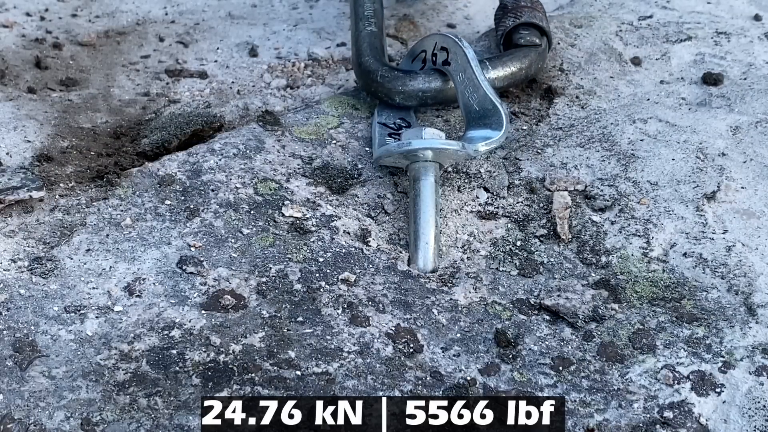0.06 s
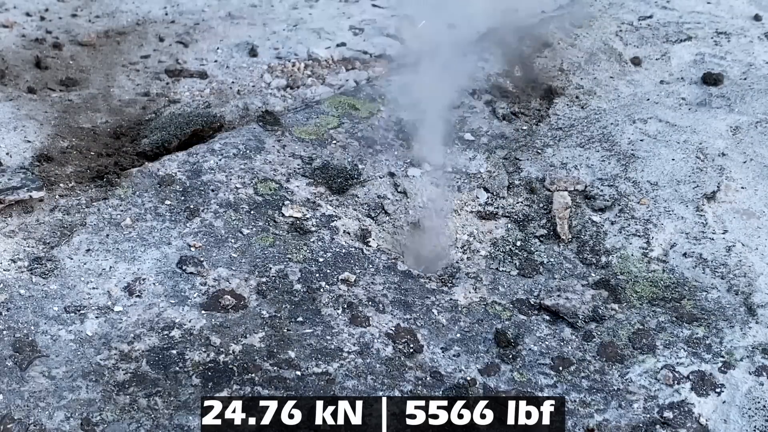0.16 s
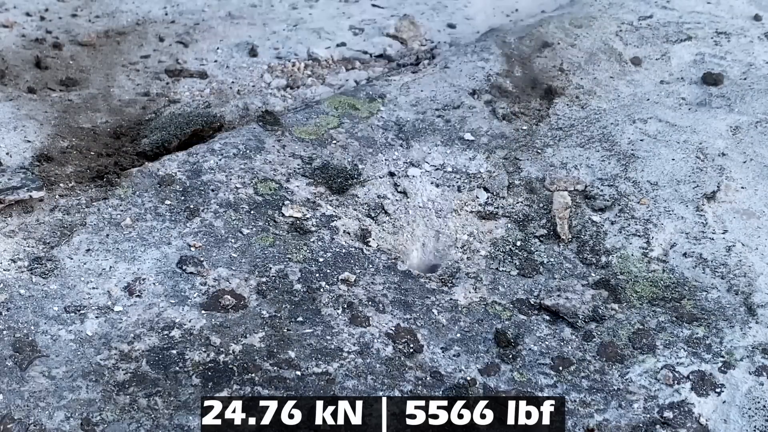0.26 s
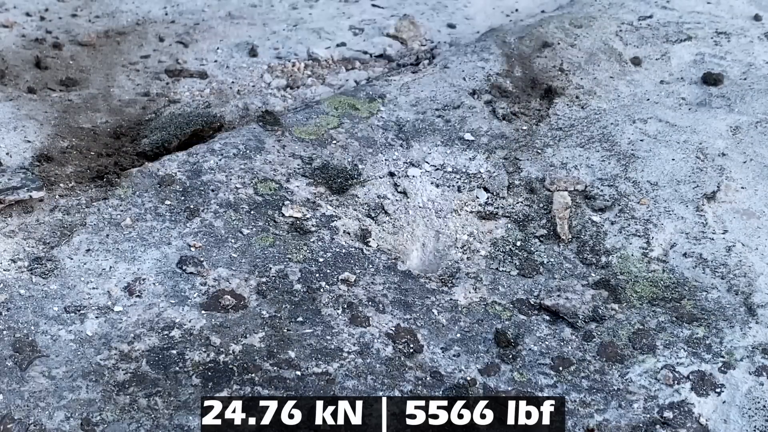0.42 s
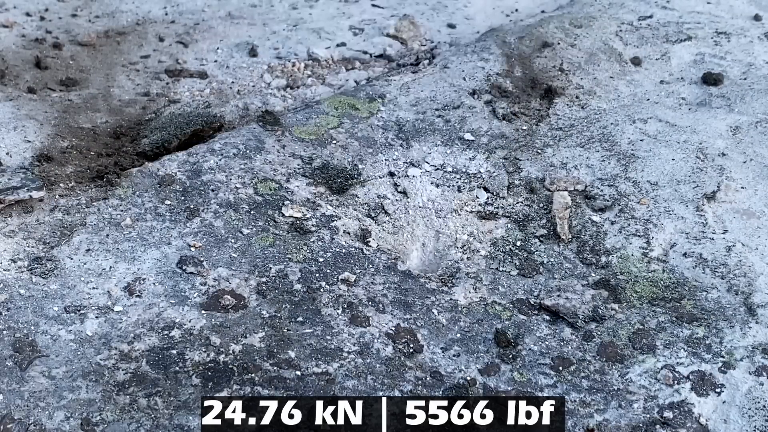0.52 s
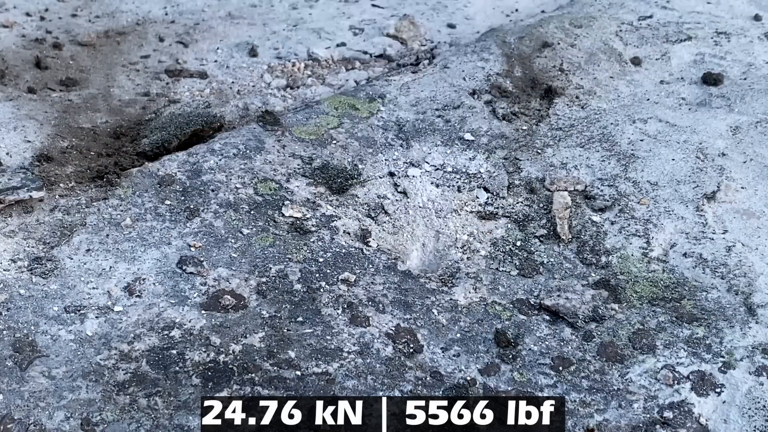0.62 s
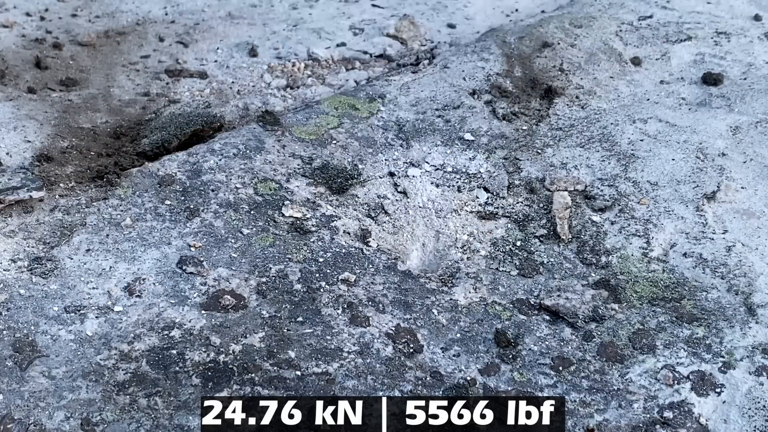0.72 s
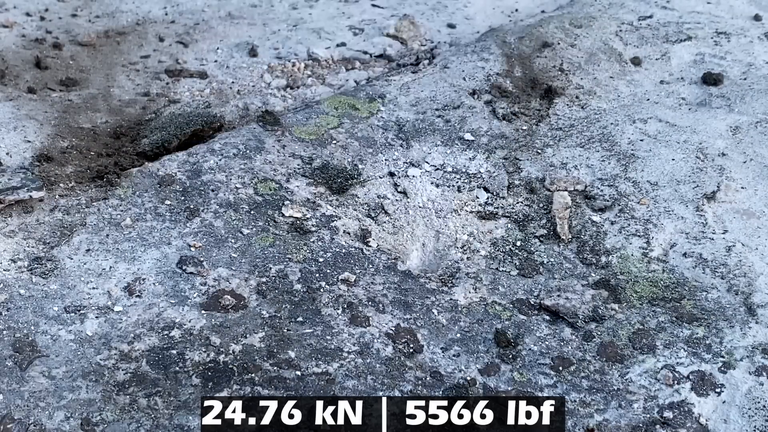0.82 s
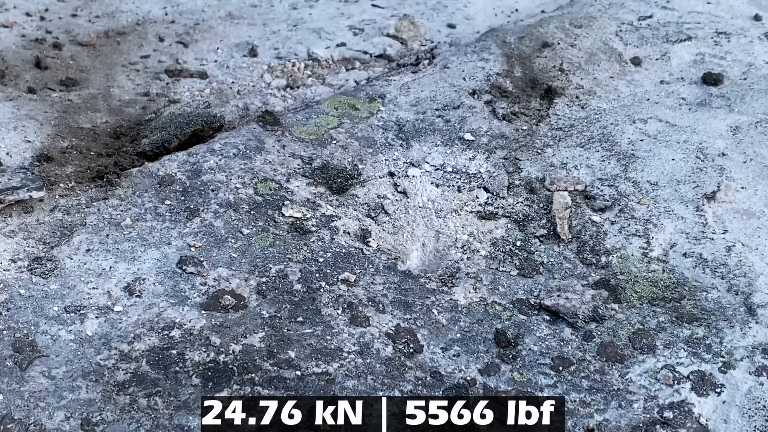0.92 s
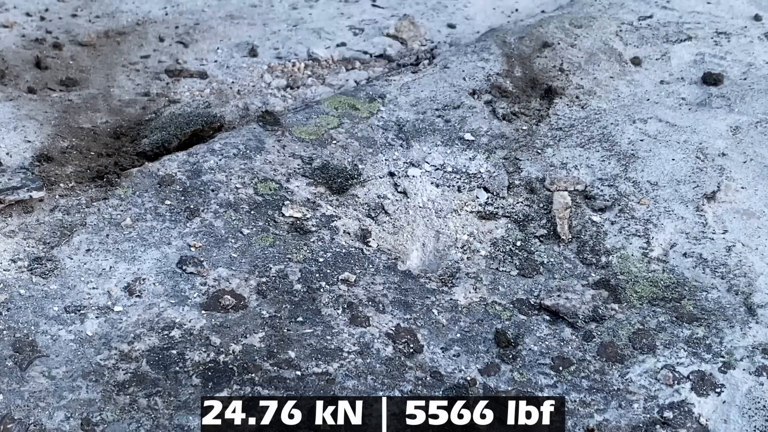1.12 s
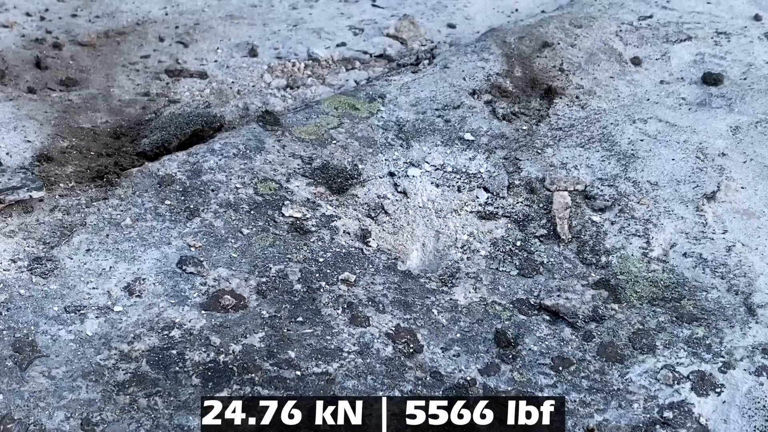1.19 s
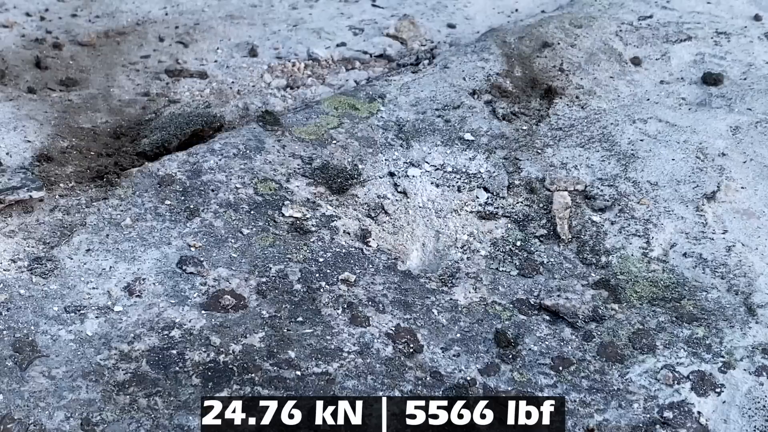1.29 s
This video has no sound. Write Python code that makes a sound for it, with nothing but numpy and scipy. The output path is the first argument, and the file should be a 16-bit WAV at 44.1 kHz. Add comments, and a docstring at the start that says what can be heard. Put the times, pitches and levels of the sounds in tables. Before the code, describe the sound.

A steel bolt ticks under a faint hum, then snaps from the rock with a sharp, close crack at about 0.25 seconds. From 0.3 seconds slack rigging thuds and scrapes over the stone while a shackle clinks, slamming down hard at 0.65 seconds. The broken bolt bounces with bright, ringing clinks, strongest between 0.8 and 1 second, and settles by 1.1 seconds, leaving quiet outdoor air.

```python
"""A steel anchor bolt snaps as it is pulled out of a rock slab, outdoors and close by.
It ticks under the load while the pulling rig hums, then fractures with a crack that kicks the slab.
The slack rigging thuds and drags over the rock, its shackle clinks and slams down, and the broken bolt
bounces to rest. Struck steel and rock ring as sums of damped modes; brittle fracture is decaying noise.
Two microphones pick this up with faint reflections from the rocks, over quiet outdoor air."""
import sys
import numpy as np
from scipy import signal
from scipy.fft import rfft, irfft, next_fast_len
from scipy.io import wavfile
from scipy.ndimage import uniform_filter1d

SR = 44100
rng = np.random.default_rng(int(sys.argv[2]) if len(sys.argv) > 2 else 0)


def materialize(psi):
    """Save the field psi as 16-bit PCM at rate SR to the path in sys.argv[1].

    A 1-D psi becomes a single channel; in a 2-D psi each row is a channel.
    """
    bounded = np.clip(np.atleast_2d(psi).T, -1, 1)
    quanta = np.round(bounded * 32767).astype(np.int16)
    wavfile.write(sys.argv[1], SR, quanta)


N = 59535
TIME = np.arange(N) / SR
FFT_SIZE = next_fast_len(2 * N, True)
BIN_HZ = np.maximum(np.arange(FFT_SIZE // 2 + 1) * SR / FFT_SIZE, 1)
OPPOSITE = np.array([[1], [-1]])  # signs for left and right

# Rumble of the loaded rig and the dragged rigging. Each row: frequency in Hz, relative level in dB.
RUMBLE_SPECTRUM = [(25, -23), (55, -12.5), (130, 3.5), (300, -3.5), (480, -6), (750, -12), (1200, -19.5),
                   (3000, -44)]


def bolt_fracture():
    """Release of elastic energy: the bolt gives in small ticks, then cracks and recoils."""
    # Each row: start in seconds, level in dB, 60 dB decay time (T60) in seconds.
    ticks = [(.0195, -51, .04), (.1215, -31, .012), (.1245, -44, .03), (.1855, -28.5, .018),
             (.208, -44, .03), (.2228, -39.5, .06), (.2363, -27, .014)]
    cracks = [(.2416, -8.5, 0.013), (.2438, -9, 0.014), (.2458, -21.5, 0.01), (.2523, -20.5, 0.019)]
    # Each row: frequency in Hz, relative level in dB.
    tick_spectrum = [(300, -21), (1500, -7.5), (3000, -16.5), (3700, 2), (5200, 5), (6300, -5), (7500, 0.5),
                     (11000, -6), (15000, -14)]
    crack_spectrum = [(100, -11.5), (350, -0.5), (850, 11), (1150, -5), (1450, 0.5), (2000, -4.5),
                      (3200, 2), (4500, -4), (5900, -9), (7500, 2), (10500, -2), (14000, -4.5),
                      (16000, -9.5)]
    return brittle_bursts(ticks, tick_spectrum) + brittle_bursts(cracks, crack_spectrum)


def slab_kick():
    """Impulse excitation: the released load sets the slab's modes ringing."""
    # Each row: start in seconds, level in dB, contact time in seconds.
    kicks = [(.2416, -12, 0.00031), (.2432, -3.5, 0.0014)]
    # Each row: frequency in Hz, gain in dB, T60 in seconds.
    slab_modes = [(70, -18.5, 0.068), (135, -8, 0.036), (275, -4, 0.035), (640, -2, .016),
                  (890, 1.5, 0.0098), (1450, -8.5, .018), (2923, 7.5, 0.0056), (3700, 7.5, 0.029)]
    return heavy_blows(kicks, slab_modes)


def bouncing_bolt():
    """Free vibration after impact: each bounce rings the broken bolt and chips the rock."""
    # Each row: start in seconds, ring level in dB, most excited frequency in Hz, factor on modal T60,
    # chip level in dB, chip T60 in seconds.
    bounces = [(.6515, -38.5, 3880, 0.44, -45.5, 0.018), (0.742, -36.5, 3580, 1.3, -46, 0.036),
               (0.793, -60, 9000, 0.66, -33, 0.011), (.8225, -22, 12700, 1.1, -19, 0.019),
               (0.8326, -16.5, 10600, 0.36, -22.5, 0.023), (.833, -20, 3480, 0.17, -35, .02),
               (0.835, -14.5, 14000, 0.29, -31.5, .025), (0.8414, -40, 4870, 1.1, -33.5, .06),
               (.8565, -40, 13000, 0.82, -28, .025), (0.8701, -45.5, 8200, .7, -25, 0.023),
               (.875, -27, 4900, 0.43, -34.5, 0.036), (0.8801, -30.5, 9030, 0.45, -36.5, 0.065),
               (0.8915, -50, 5000, 0.89, -25, .022), (.935, -43.5, 2860, 1.5, -50, .05),
               (0.967, -16, 9500, 0.26, -30, .016), (0.9823, -25, 13500, 0.57, -26, .018),
               (.9875, -44, 3000, 0.51, -27, .04), (.994, -27.5, 15000, 0.51, -15, 0.015),
               (1.0081, -45, 13500, .5, -31.5, .03), (1.026, -36, 3440, 0.23, -43, .025),
               (1.0373, -49.5, 9900, 0.76, -34.5, .03), (1.046, -52, 5000, 0.18, -45, .012),
               (1.056, -70, 13000, .3, -42, .01), (1.061, -48, 9800, 0.25, -35.5, 0.015),
               (1.1009, -35, 3700, 0.082, -43.5, 0.025)]
    # Each row: frequency in Hz, gain in dB, T60 in seconds.
    bolt_modes = [(2510, -7.5, .08), (3120, -7, 0.29), (3340, -11, 0.087), (3494, -5, .2), (3517, -6, 0.11),
                  (4680, -5.5, 0.25), (4680, -8, 0.31), (5125, -16, 0.14), (5850, -18, 0.11),
                  (7440, 2.5, .05), (8202, -10, .4), (9720, -17, .12), (9737, -2.5, 0.18),
                  (9630, -2.5, 0.08), (9800, -12.5, 0.0503), (10220, -1.5, 0.0511), (10400, -8.5, 0.045),
                  (10860, -9, 0.061), (11600, -13.5, .1), (13480, -3, .07), (13630, -6.5, 0.13),
                  (13100, -18.5, 0.14), (14000, -12.5, 0.057), (15060, -12.5, 0.116)]
    # Each row: frequency in Hz, relative level in dB.
    chip_spectrum = [(70, -33.5), (400, -17.5), (900, -13), (1600, -5.5), (2400, 3), (4000, 5.5),
                     (5700, 3.5), (7200, 2.5), (10000, 1), (13000, -1), (15200, -2)]
    strikes = [row[:4] for row in bounces]
    chips = [(start, db, t60) for start, *_, db, t60 in bounces]
    return struck_steel(strikes, bolt_modes) + brittle_bursts(chips, chip_spectrum)


def shackle_ring():
    """Resonance: sliding friction drives the shackle's modes to a shimmer; impacts make them clink."""
    # Each row: frequency in Hz, gain in dB, T60 in seconds.
    modes = [(1865, 2.5, 0.42), (2306, -6, .2), (2640, -5.5, .4), (3127, -2.5, .4), (3580, 4, .2),
             (3740, -1.5, 0.17), (4120, -16, .15), (4646, -10.5, 0.6), (5475, -5, .2), (5884, -6, 0.22),
             (6720, -8, 0.22), (7030, -4, .12), (7100, 0.5, .1), (7880, -4.5, 0.16), (8700, -14, 0.23),
             (9690, -11, .2), (9760, -4, 0.56), (12860, -7, .25), (13787, -4.5, .3), (14350, -11.5, .2)]
    # Each row: time in seconds, friction level in dB.
    slide = [(.24, -90), (.27, -59), (.32, -57), (.37, -58), (.42, -46.5), (.5, -45.5), (.55, -47.5),
             (.62, -50), (.68, -56.5), (.78, -50.5), (.85, -77), (1, -100)]
    # Each row: start in seconds, level in dB, most excited frequency in Hz, factor on modal T60.
    clinks = [(.382, -31, 6700, 0.55), (.398, -49.5, 13500, 0.9), (.416, -42.5, 9700, .8),
              (.47, -35.5, 5400, 1), (.483, -36, 7450, 0.6), (.495, -34, 1890, 0.46),
              (.517, -43, 10000, .9), (.565, -47, 4000, .7), (.617, -43, 3700, 0.69),
              (.623, -33.5, 6500, 0.35)]
    friction = amp(np.interp(TIME, *np.transpose(slide))) * rng.standard_normal(N)
    shimmer = 0
    for hz, db, free_t60 in modes:
        t60 = 0.66 * free_t60  # contact shortens the ring
        unit_power_gain = np.sqrt(4 * np.log(1000) / (t60 * SR))
        shimmer += amp(db) * unit_power_gain * damped_mode(friction, hz, t60)
    shimmer /= np.linalg.norm([amp(db) for _, db, _ in modes])
    return struck_steel(clinks, modes) + shimmer


def shackle_slam():
    """Inelastic impact: the heavy hardware crushes rock and slams down with a low, damped ring."""
    # Each row: start in seconds, level in dB, T60 in seconds.
    crunches = [(.297, -46, 0.019), (.32, -56, 0.032), (.331, -51, 0.048), (.339, -35, 0.032),
                (.374, -40, 0.012), (.47, -44, 0.14), (.48, -30, 0.029), (.492, -36.5, 0.11),
                (.5995, -37, 0.013), (.62, -34.5, 0.11), (.641, -12.5, 0.013), (.647, -29, 0.055),
                (.659, -31.5, 0.028), (.69, -41.5, 0.033), (.702, -40.5, 0.021), (.741, -42, 0.12),
                (.783, -38.5, 0.059), (.8688, -25, 0.021)]
    # Each row: frequency in Hz, relative level in dB.
    crunch_spectrum = [(200, -10), (800, -2.5), (1600, 2.5), (2400, 6.5), (3000, -3.5), (4200, 1),
                       (5800, -8), (7000, -9.5), (10000, -12), (14000, -17), (16000, -27.5)]
    # Each row: start in seconds, level in dB, contact time in seconds.
    slams = [(.6412, -1, .0003), (.6465, -10.5, .0025), (.6525, -35, .003)]
    # Each row: frequency in Hz, gain in dB, T60 in seconds.
    slam_modes = [(73.7, -8.5, 0.11), (153, -2, 0.061), (284, -4, 0.033), (632, -8, 0.044),
                  (876, -13, 0.03), (1270, -16.5, 0.031), (1480, -32.5, .03), (2310, -26, .06),
                  (2430, -15, .06), (4110, -2, .02)]
    return brittle_bursts(crunches, crunch_spectrum) + heavy_blows(slams, slam_modes)


def rigging_thuds():
    """Heavy damping: rope and slings land on rock, each a brief thump with a scuff around its pitch."""
    # Each row: start in seconds, level in dB, pitch in Hz, T60 in seconds.
    thuds = [(0.134, -33.5, 125, .08), (0.295, -45, 600, .04), (.2975, -20.5, 656, 0.023),
             (.3, -15, 384, .04), (0.305, -22.5, 62, .14), (0.3178, -28, 480, .035),
             (.322, -22.5, 170, .07), (.332, -21.5, 320, .05), (0.367, -26, 520, .04),
             (.372, -17.5, 165, .08), (0.383, -20, 350, .06), (0.407, -25.5, 260, .07),
             (0.422, -22.5, 150, .08), (.429, -21.5, 360, .05), (0.441, -29, 59.4, .1),
             (.470, -35.5, 600, .05), (.478, -20, 382, 0.029), (.481, -27, 750, .04),
             (0.501, -36, 190, .08), (.532, -35.5, 650, .04), (0.561, -29, 170, .08),
             (.598, -25.5, 280, .05), (0.603, -18.5, 150, .07), (0.701, -28.5, 1100, .025),
             (0.7049, -15, 321, 0.039), (.712, -23.5, 145, .13), (0.87, -37, 105, .2),
             (1.037, -45, 1150, .025), (1.072, -48.5, 497, 0.026)]
    edge_ratio, scuff_db = 1.83, -12
    sound = np.zeros(N)
    for start, db, hz, t60 in thuds:
        low, high = hz / edge_ratio, hz * edge_ratio
        band = signal.butter(2, [low, high], "band", fs=SR, output="sos")
        envelope = decay(start, t60)
        scuff = signal.sosfilt(band, envelope * rng.standard_normal(N) + 1e-18)
        scuff *= np.sqrt(SR / 2 / (high - low))  # make up the power lost outside the band
        thump = signal.sosfilt(band, envelope * np.sin(2 * np.pi * hz * (TIME - start)) + 1e-18)
        sound += amp(db) * (thump + amp(scuff_db) * scuff)
    return sound


def rigging_drag():
    """Friction noise: the sliding rigging rumbles and scatters grit in randomly timed clicks."""
    # Each row: time in seconds, rumble level in dB, grit level in dB.
    drag_levels = [(.2, -92, -100), (.235, -63.5, -65.5), (.25, -45, -38), (.285, -44, -49),
                   (.32, -27, -38.5), (.36, -43, -49.5), (.42, -38.5, -42.5), (.5, -38.5, -47),
                   (.55, -38, -46.5), (.61, -41, -51), (.68, -31.5, -57.5), (.76, -39.5, -44),
                   (.82, -43.5, -53.5), (.92, -54, -59), (1.05, -57, -58), (1.13, -58.5, -93),
                   (1.35, -71, -76.5)]
    # Each row: frequency in Hz, relative level in dB.
    grit_spectrum = [(300, -12), (1200, -6.5), (2200, 5), (3700, 6), (5500, -1.5), (7300, -2), (10000, 0.5),
                     (14000, -9), (16000, -17.5)]
    grains_per_s, spread_db, grain_share = 1000, 3.5, 0.58
    times, rumble_db, grit_db = np.transpose(drag_levels)
    hits = rng.random(N) < grains_per_s / SR
    strengths = amp(spread_db * np.minimum(rng.exponential(1, N), 4))
    grains = unit_rms(hits * strengths * rng.choice([-1, 1], N))
    grit = np.sqrt(grain_share) * grains + np.sqrt(1 - grain_share) * rng.standard_normal(N)
    grit *= amp(np.interp(TIME, times, grit_db))
    rumble = amp(np.interp(TIME, times, rumble_db)) * rng.standard_normal(N)
    return colour(grit, grit_spectrum) + colour(rumble, RUMBLE_SPECTRUM)


def pulling_rig():
    """Forced vibration: the rig hums, hisses and rumbles under load, then dies away after the break."""
    # Each row: frequency in Hz, relative level in dB.
    partials = [(209, -57.5), (477.5, -50.5), (955, -67), (1432, -67), (4296, -68.5), (5259, -83),
                (6686, -71.5), (7165, -77.5), (7650, -71.5)]
    hiss_spectrum = [(1000, -12), (2200, 3), (3200, -1), (4300, -2), (5800, -8.5), (7300, -2.5), (10000, 7),
                     (15000, -3)]
    end_s, pitch_waver = 0.29, .003
    drift = uniform_filter1d(rng.standard_normal(N), size=900)
    drift = unit_rms(uniform_filter1d(drift, size=900))
    clock = np.cumsum(1 + pitch_waver * drift) / SR
    hum = sum(np.sqrt(2) * amp(db) * np.sin(2 * np.pi * hz * clock) for hz, db in partials)
    hiss = amp(-61) * colour(rng.standard_normal(N), hiss_spectrum)
    rumble = amp(-50.5) * colour(rng.standard_normal(N), RUMBLE_SPECTRUM)
    envelope = (TIME < end_s) + decay(end_s, t60=0.17)
    return (hum + hiss + rumble) * envelope


def slab_reflections(x):
    """Early reflection: the rough slab sets the two channels apart above the bass."""
    echo = rng.standard_normal(N) * decay(0.00046, t60=.012)
    high_pass = signal.butter(1, 700, "high", fs=SR, output="sos")
    echo = signal.sosfilt(high_pass, echo / np.linalg.norm(echo))
    return amp(-24.5) * filtered(x, rfft(echo, FFT_SIZE)) * OPPOSITE


def rock_scatter(x):
    """Diffuse scattering: the rocks around return a faint tail, different on each side."""
    tail = rng.standard_normal((2, N)) * decay(.004, t60=.25)
    tail /= np.sqrt(np.sum(tail ** 2) / 2)
    return amp(-33.5) * filtered(x, rfft(tail, FFT_SIZE))


def outdoor_air():
    """Partly coherent ambient noise: a low, quiet rush, mostly common to both channels."""
    # Each row: frequency in Hz, relative level in dB.
    air_spectrum = [(25, -10), (65, -3.5), (130, -3), (250, -7.5), (500, -12), (900, -15.5), (1400, -24.5),
                    (2500, -37.5), (5500, -28.5), (10500, -26.5), (15000, -34)]
    mid, side = colour(rng.standard_normal((2, N)), air_spectrum)
    return amp(-59.5) * (mid + amp(-5.5) * side * OPPOSITE)


def brittle_bursts(events, spectrum):
    """Incoherent addition: dense runs of tiny fractures merge into decaying noise; their powers add."""
    power = sum((amp(db) * decay(start, t60)) ** 2 for start, db, t60 in events)
    return colour(np.sqrt(power) * rng.standard_normal(N), spectrum)


def heavy_blows(blows, modes):
    """Contact time limits bandwidth: the longer a half-sine push on a body, the duller it sounds."""
    force = np.zeros(N)
    for start, db, contact_s in blows:
        push = np.sin(np.pi * np.clip((TIME - start) / contact_s, 0, 1))
        force += amp(db) * push / push.sum()
    return sum((-1) ** k * amp(db) * damped_mode(force, hz, t60) for k, (hz, db, t60) in enumerate(modes))


def struck_steel(strikes, modes):
    """Modal superposition: each contact favours the modes near one frequency and sets their damping."""
    focus_octaves, off_focus_db, spread_db = 0.52, -21, 5
    mode_hz, mode_db, mode_t60 = np.transpose(modes)
    sound, click = np.zeros(N), signal.unit_impulse(N // 2)
    for start, db, focus_hz, t60_factor in strikes:
        off_focus = 1 - np.exp(-(np.log2(mode_hz / focus_hz) / focus_octaves) ** 2)
        levels = db + mode_db + off_focus_db * off_focus + spread_db * rng.standard_normal(len(modes))
        gains = amp(levels) * rng.choice([-1, 1], len(modes))
        ring = sum(gain * damped_mode(click, hz, t60 * t60_factor)
                   for gain, hz, t60 in zip(gains, mode_hz, mode_t60))
        onset = int(start * SR)
        sound[onset:onset + len(ring)] += ring[:N - onset]
    return sound


def damped_mode(force, hz, t60):
    """Damped harmonic oscillator: a unit click leaves a sine that decays from height 1."""
    radius, step = amp(-60 / (t60 * SR)), 2 * np.pi * hz / SR
    return signal.lfilter([0, np.sin(step)], [1, -2 * radius * np.cos(step), radius ** 2], force + 1e-18)


def decay(start, t60):
    """Exponential decay: jumps to 1 at start, then falls 60 dB per t60 to a floor of -120 dB."""
    return (TIME >= start) * amp(-60 * np.clip((TIME - start) / t60, 0, 2))


def colour(x, spectrum):
    """Minimum-phase filter: causal, with the given spectrum; keeps the power of white noise."""
    magnitude = unit_rms(amp(at_bins(spectrum)))
    cepstrum = irfft(np.log(magnitude), FFT_SIZE)
    cepstrum[1:FFT_SIZE // 2] *= 2
    cepstrum[FFT_SIZE // 2 + 1:] = 0
    return filtered(x, np.exp(rfft(cepstrum)))


def filtered(x, response):
    """Convolution as a product of spectra."""
    return irfft(rfft(x, FFT_SIZE) * response, FFT_SIZE)[..., :N]


def at_bins(points):
    """Interpolation over log frequency at every bin."""
    hz, value = np.transpose(points)
    return np.interp(np.log(BIN_HZ), np.log(hz), value)


def amp(db):
    """Decibels to amplitude ratio."""
    return 10 ** (np.asarray(db) / 20)


def unit_rms(x):
    """Normalisation to rms 1."""
    return x / np.sqrt(np.mean(x ** 2) + 1e-20)


def at_microphones(x, side, pan_db):
    """Direction cues: a source off to one side reaches two microphones unequal in phase and level."""
    # Each row: frequency in Hz, phase lead of the left in radians when side is 1.
    phase_lead = [(60, .03), (250, .08), (550, 0.141), (1100, 0.71), (2000, .45), (4500, 0.39),
                  (9000, 1.21), (15000, 1.6)]
    # Each row: frequency in Hz, left minus right in dB before panning.
    balance = [(250, 0.2), (600, -0.5), (1000, -0.2), (2000, 0.5), (15000, 0)]
    log_ratio = 1j * side * at_bins(phase_lead) + np.log(amp(at_bins(balance) + pan_db))
    return filtered(x, np.exp(log_ratio * OPPOSITE / 2))


def scene():
    """Superposition: the direct sound of every source, its reflections and the outdoor air add up."""
    direct = (at_microphones(pulling_rig(), side=-.8, pan_db=-3.0)
              + at_microphones(bolt_fracture() + slab_kick(), side=0.98, pan_db=-0.1)
              + at_microphones(rigging_thuds() + rigging_drag(), side=1.0, pan_db=-0.8)
              + at_microphones(shackle_ring() + shackle_slam(), side=1.0, pan_db=-0.3)
              + at_microphones(bouncing_bolt(), side=-0.99, pan_db=-0.4))
    mono = direct.mean(0)
    return direct + outdoor_air() + slab_reflections(mono) + rock_scatter(mono)


def record(dry):
    """Microphone response: two treble notches, no deep bass, softly saturated peaks and a cut top."""
    # Each row: centre in Hz, width in Hz, gain at the centre in dB.
    notches = [(8540, 480, -26), (11820, 880, -20.5)]
    low_cut_hz, stopband_hz, ceiling = 32, 16400, .9
    for hz, width, db in notches:
        notched = signal.lfilter(*signal.iirnotch(hz, hz / width, fs=SR), dry)
        dry = notched + amp(db) * (dry - notched)
    dry = signal.sosfilt(signal.butter(2, low_cut_hz, "high", fs=SR, output="sos"), dry)
    saturated = ceiling * np.tanh(dry / ceiling)
    return signal.sosfilt(signal.cheby2(18, 50, stopband_hz, fs=SR, output="sos"), saturated)


dry = scene()
out = record(dry)
materialize(out)
```